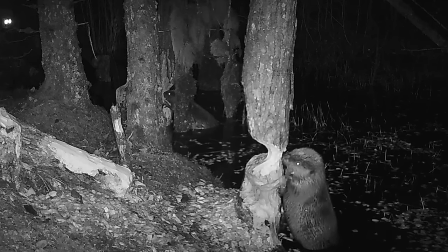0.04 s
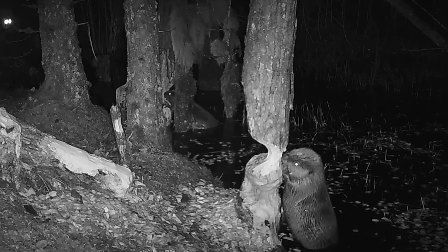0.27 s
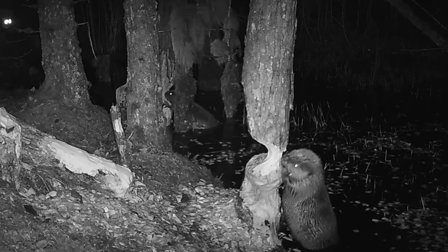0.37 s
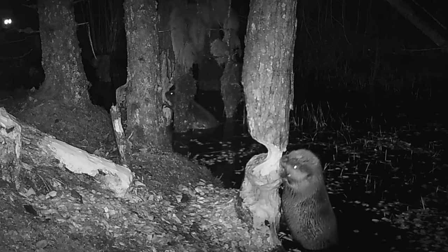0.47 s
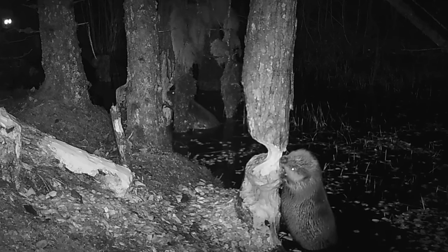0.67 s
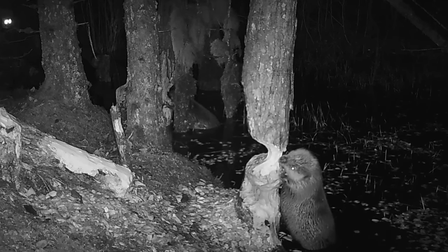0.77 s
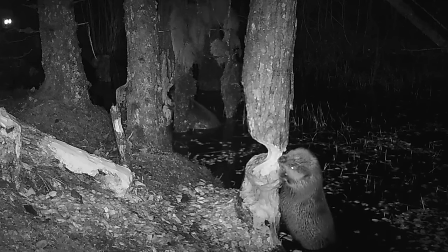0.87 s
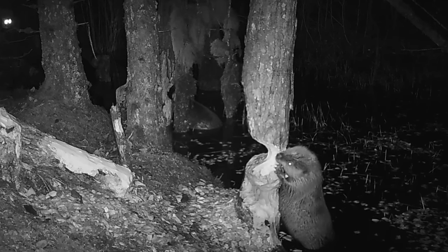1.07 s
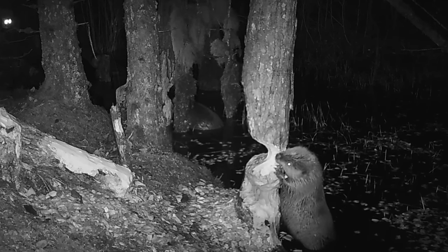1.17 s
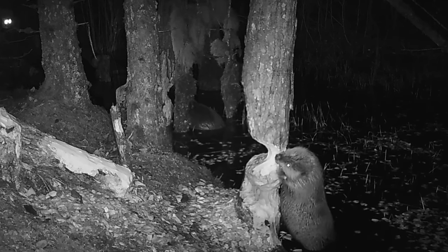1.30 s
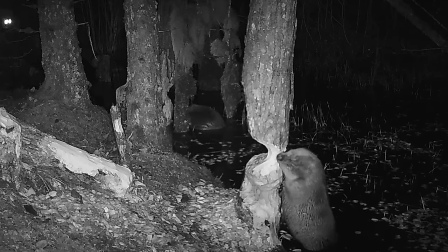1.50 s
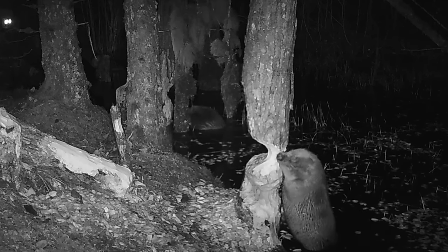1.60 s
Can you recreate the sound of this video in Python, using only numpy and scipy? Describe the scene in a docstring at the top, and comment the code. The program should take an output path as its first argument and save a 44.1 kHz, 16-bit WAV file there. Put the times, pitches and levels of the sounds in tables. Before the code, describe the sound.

A beaver bites a tree trunk: at about 0.2 s a brief, dry rasp of teeth with two sharp, bright wood cracks some 0.035 s apart, small snaps and splinters, over by 0.3 s with a faint short outdoor tail. Four tiny scrapes follow at roughly 1.03, 1.25, 1.45 and 1.55 s. Steady microphone hiss and faint, even high pips, about twenty per second, continue throughout with thin whine.

```python
"""Throughout a night by a pond: steady microphone hiss (shaped noise) with thin sine tones, and faint, evenly
spaced sine pips, probably electronic whine. At 0.21 s a beaver takes one short bite at a tree trunk: its teeth
rasp (random slips) and wood fibres snap (clicks through resonances), twice sharply, with a spray of splinters.
The cracks ring briefly in the wood (damped modes) and die away among the trees (noise tail).
From 1.03 s come four very faint scrapes."""
import sys
import numpy as np
from scipy import signal
from scipy.fft import rfft, irfft
from scipy.io import wavfile

SR = 44100
rng = np.random.default_rng(int(sys.argv[2]) if len(sys.argv) > 2 else 0)


def unload_wav(signal):
    """Save mono or channel-first audio to the path in sys.argv[1] as 16-bit WAV at rate SR, clipped to [-1, 1]."""
    wavfile.write(
        sys.argv[1],
        SR,
        np.round(np.clip(np.atleast_2d(signal).T, -1, 1) * 32767).astype(np.int16),
    )


N = 72765
T = np.arange(N) / SR
FREQS_HZ = np.arange(N // 2 + 1) * SR / N

# Snapping fibres. Each row: start in seconds, peak level in dB, pitch of the fibre in Hz,
# width of its twang resonance in Hz, splinter level at onset in dB.
FIBRE_SNAPS = [(0.2146, -31.5, 4320, 700, -53), (0.2177, -32.5, 3800, 600, -49),
               (0.2208, -13, 3790, 1530, -47), (0.23, -39.5, 4470, 350, -64),
               (0.2388, -30.5, 3200, 1100, -62), (0.2561, -11.5, 2835, 1130, -61),
               (0.25712, -18, 3430, 890, -67), (0.2622, -31, 3100, 1100, -51),
               (0.284, -28, 2600, 1300, -62), (0.2937, -28, 3970, 2000, -46)]


def from_db(db):
    """Decibels to amplitude gain."""
    return 10 ** (np.asarray(db) / 20)


def rms_one(x):
    """Scale to rms 1."""
    return x / np.sqrt(np.mean(x ** 2) + 1e-20)


def noise():
    """White Gaussian noise over the whole scene."""
    return rng.standard_normal(N)


def drift(rate_hz):
    """Random wander of rms 1: low-passed noise, halved in amplitude at rate_hz."""
    lowpass = 1 / (1 + (FREQS_HZ / rate_hz) ** 2)
    return rms_one(irfft(rfft(noise()) * lowpass, N))


def gate(t_s, length_s, edge_s):
    """Linear rise, hold and fall, starting at t_s = 0."""
    return np.clip(np.minimum(t_s, length_s - t_s) / edge_s, 0, 1)


def bandpass(x, low_hz, high_hz):
    """Butterworth band-pass."""
    sos = signal.butter(2, [low_hz, high_hz], "band", fs=SR, output="sos")
    return signal.sosfilt(sos, x)


def resonance(x, hz, width_hz):
    """Two-pole resonance with gain 1 at its peak."""
    r = np.exp(-np.pi * width_hz / SR)
    numerator = np.array([1, 0, -1]) * (1 - r * r) / 2
    denominator = [1, -2 * r * np.cos(2 * np.pi * hz / SR), r * r]
    return signal.lfilter(numerator, denominator, x + 1e-18)


def double_resonance(x, hz, width_hz):
    """Two equal resonances in series: steeper skirts, rounder onset."""
    return resonance(resonance(x, hz, width_hz), hz, width_hz)


def hiss():
    """Microphone noise of fixed spectrum, flickering slightly in level."""
    level_db, flicker_db, flicker_hz = -50, 1, 230
    # Each row: frequency in Hz, relative density in dB per Hz.
    spectrum = [(20, -19), (45, -8), (100, -10), (200, -7), (400, -4), (700, 0.5), (1400, -0.13),
                (2200, -1.5), (3200, -4.5), (4400, -7.5), (6000, -9), (7000, -10.5), (10000, -12),
                (12000, -16), (14300, -18.5), (15800, -26)]
    hz, density_db = np.transpose(spectrum)
    shape_db = np.interp(np.log(FREQS_HZ + 1), np.log(hz), density_db)
    shaped = rms_one(irfft(rfft(noise()) * from_db(shape_db), N))
    return from_db(level_db + flicker_db * drift(flicker_hz)) * shaped


def whine():
    """Steady thin sine tones."""
    # Each row: frequency in Hz, rms level in dB.
    tones = [(1448, -70), (7497, -77), (7537, -77)]
    return sum(from_db(db) * np.sqrt(2) * np.sin(2 * np.pi * hz * T) for hz, db in tones)


def pips():
    """Twenty wavering pips a second, of equal nominal cycle count, so low ones last longer; fizz fills the gaps."""
    period_s, end_s, edge_s, cycles = 0.05, 0.0495, 0.0014, 65
    wander_hz, flutter_db, octave_db = 60, 2, -12.5
    fizz_hz, fizz_width_hz, fizz_db = 3924, 1600, -61
    # Pips in turn. Each row: pitch in Hz, level of the fundamental in dB.
    pip_rows = [(2976, -49.5), (2630, -51.5), (2636, -54.5), (2994, -51.5), (3127, -49), (2690, -47),
                (3000, -50.5), (2630, -50.5), (3100, -53), (2666, -51.5), (2898, -51.5), (2970, -50.5),
                (2570, -50.5), (2573, -51.5), (2932, -51), (3060, -49), (3130, -54), (2617, -52),
                (2900, -51.5), (2990, -51), (3102, -50), (2693, -52), (2604, -50), (2993, -49.5),
                (2977, -49.5), (2665, -53.5), (2923, -49), (2510, -51), (3090, -54), (2785, -50.5),
                (2880, -49.5), (3060, -50), (2495, -49.5)]
    index = np.minimum((T / period_s).astype(int), len(pip_rows) - 1)
    hz, db = np.array(pip_rows)[index].T
    on = gate(end_s - T % period_s, cycles / hz, edge_s)  # time runs back from the common end
    phase = 2 * np.pi * np.cumsum(hz + wander_hz * drift(rate_hz=92)) / SR
    wave = np.sin(phase) + from_db(octave_db) * np.sin(2 * phase)
    tone = wave * from_db(db + flutter_db * drift(rate_hz=170))
    fizz = rms_one(double_resonance(noise(), fizz_hz, fizz_width_hz))
    return on * tone + (1 - on) * from_db(fizz_db) * fizz


def forest(x):
    """Faint scatter from the surrounding trunks: a delayed, decaying noise tail."""
    t60_s, level_db, delay_s = 0.26, -17, 0.0027
    tail = noise() * 1000. ** (-T / t60_s) * (T > delay_s)
    return from_db(level_db) * signal.fftconvolve(x, tail / np.linalg.norm(tail))[:N]


def trunk(force):
    """The wood's short damped modes, alternating in sign; little bass or treble is radiated."""
    # Each row: frequency in Hz, relative level in dB, 60 dB decay time in seconds.
    modes = [(2080, 0, 0.013), (2390, -9, 0.016), (2650, -3, .011), (3137, 2.5, 0.011), (3690, 0, 0.014),
             (4540, -14.5, 0.0098), (5010, -6, 0.0075)]
    ringing = 0
    for k, (hz, db, t60_s) in enumerate(modes):
        r = from_db(-60 / (t60_s * SR))
        w = 2 * np.pi * hz / SR
        mode = signal.lfilter([0, np.sin(w)], [1, -2 * r * np.cos(w), r * r], force + 1e-18)
        ringing = ringing + (-1) ** k * from_db(db) * mode
    return bandpass(ringing, 1860, 4900)


def scrapes():
    """Dense, uneven slips of the teeth excite the trunk."""
    slips_per_s, slip_spread_db, width_hz, edge_s = 1500, 8.5, 1000, 0.004
    # Each row: start in seconds, length in seconds, rms level in dB, pitch in Hz.
    strokes = [(0.21, 0.091, -47.5, 3400), (1.03, 0.045, -60, 4130), (1.251, 0.028, -57.5, 4020),
               (1.446, 0.035, -54.5, 4200), (1.554, 0.035, -54, 4340)]
    slip_now = rng.random(N) < slips_per_s / SR
    slips = slip_now * rng.choice([-1, 1], N) * from_db(slip_spread_db * noise())
    out = np.zeros(N)
    for start_s, length_s, db, hz in strokes:
        rasp = rms_one(trunk(double_resonance(slips, hz, width_hz)))
        out += from_db(db) * gate(T - start_s, length_s, edge_s) * rasp
    return out


def splinters():
    """A faint bright spray, noise an octave wide, decays after each snap."""
    low_hz, t60_s = 4280, 0.02
    spray = np.zeros(N)
    for start_s, *_, db in FIBRE_SNAPS:
        spray += (T > start_s) * from_db(db) * 1000. ** (-np.abs(T - start_s) / t60_s)
    return spray * rms_one(bandpass(noise(), low_hz, 2 * low_hz))


def snaps():
    """Each breaking fibre gives a short twang at its own pitch, which sets the trunk ringing."""
    out = np.zeros(N)
    for start_s, db, hz, width_hz, _ in FIBRE_SNAPS:
        click = np.zeros(N)
        click[int(start_s * SR)] = 1
        crack = trunk(double_resonance(click, hz, width_hz))
        out += from_db(db) * crack / np.abs(crack).max()
    return out


def scene():
    """The bite, the later scrapes and their scatter over the steady background."""
    bite = snaps() + splinters() + scrapes()
    return (bite + forest(bite) + pips() + hiss() + whine())[None]


def record(dry):
    """Three narrow hollows colour the treble, and the top is cut steeply."""
    cutoff_hz = 15850
    # Each row: centre in Hz, half width at half depth in Hz, depth in dB.
    hollows = [(5500, 85, 20), (10980, 190, 12), (13020, 170, 13)]
    hollow_db = sum(depth_db / (1 + ((FREQS_HZ - hz) / width_hz) ** 2) for hz, width_hz, depth_db in hollows)
    coloured = irfft(rfft(dry) * from_db(-hollow_db), N)
    lowpass = signal.firwin(601, cutoff_hz, fs=SR)
    return signal.fftconvolve(coloured, lowpass[None], "same", axes=1)


dry = scene()
out = record(dry)
unload_wav(out)
```